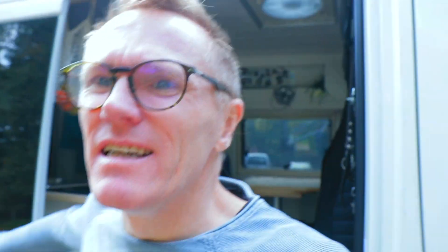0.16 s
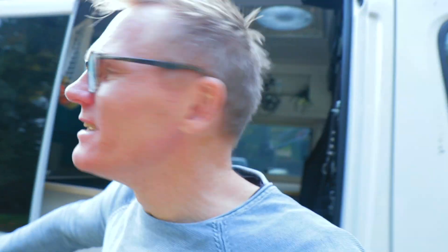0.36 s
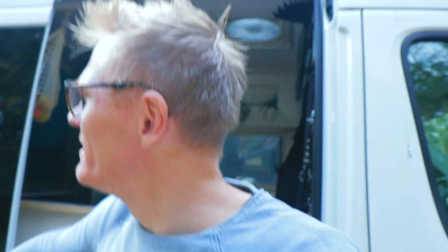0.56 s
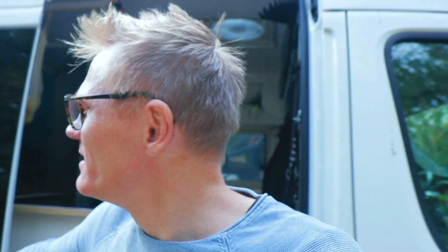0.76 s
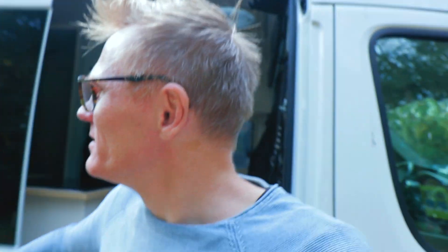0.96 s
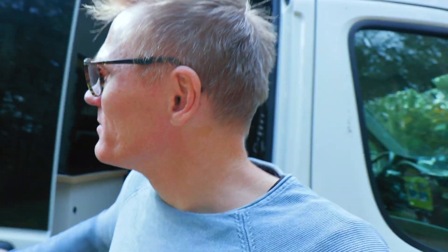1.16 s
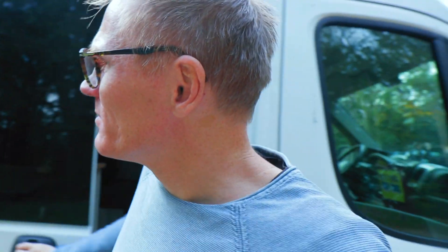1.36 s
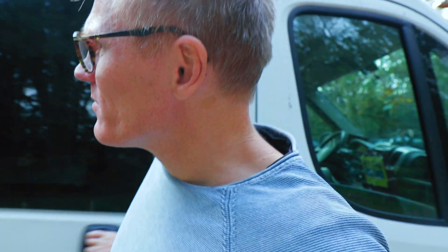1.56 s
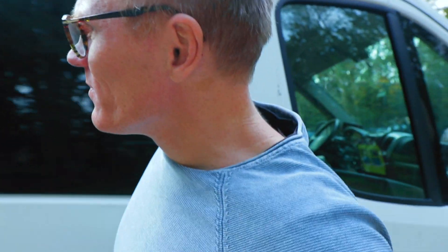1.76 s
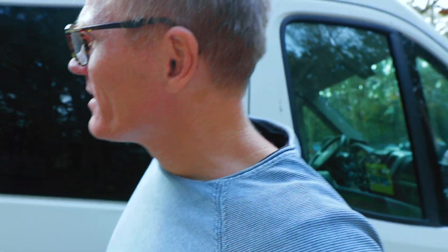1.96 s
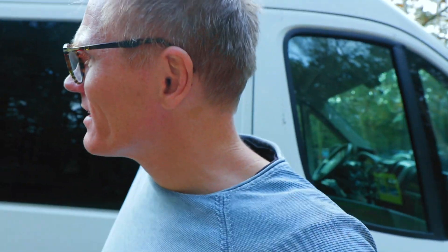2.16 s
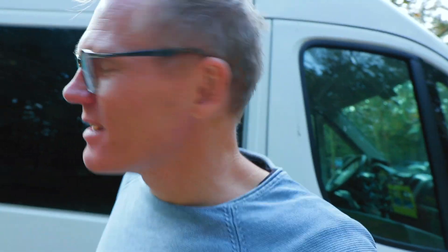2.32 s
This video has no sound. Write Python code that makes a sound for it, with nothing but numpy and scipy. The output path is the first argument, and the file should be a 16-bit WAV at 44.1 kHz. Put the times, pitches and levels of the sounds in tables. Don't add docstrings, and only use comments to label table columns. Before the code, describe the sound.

A van's sliding side door rumbles along its track and slams shut with a rattling metallic crash

```python
import sys
import numpy as np
from scipy import signal
from scipy.io import wavfile
from scipy.ndimage import uniform_filter1d

SR = 44100
rng = np.random.default_rng(int(sys.argv[2]) if len(sys.argv) > 2 else 0)


def decibels_to_gain(level_db):
    exponent = np.asarray(level_db, float) / 20
    return 10 ** exponent


def bounce(signal):
    frames = np.transpose(np.atleast_2d(signal))
    limited = np.clip(frames, -1, 1)
    pcm = np.round(limited * 32767).astype(np.int16)
    wavfile.write(sys.argv[1], SR, pcm)


N = 109764

# (time [s], body level [dB], struck region [Hz], clack level [dB],
# share of the ring time left by the seal [1])
SLAM = [(1.8292, -7, 518, -23, 0.14), (1.8320, -10.5, 343, -36, 0.085), (1.8339, -8.5, 400, -10.5, 0.24),
        (1.852, -11.5, 817, -22, 0.15), (1.8562, -5.5, 400, -18, 0.116), (1.8588, -4, 371, -2.5, 0.19),
        (1.8700, -14, 600, -7, 0.12), (1.8877, -3, 726, -19, 0.3), (1.8907, -6.5, 297.6, -4, 0.098),
        (1.8930, -1.5, 600, -10.5, 0.18), (1.880, -16, 54, -49, 0.33), (1.8980, -6.5, 156, -32, 0.061),
        (1.903, -21, 472, -31, 0.44), (1.919, -13, 126, -39, 0.23), (1.944, -22, 790, -24, 0.22),
        (1.9498, -19.5, 460, -22.5, 0.47), (1.965, -18, 143, -23, .15), (1.977, -18, 380, -36, 0.18),
        (2.008, -35, 304, -30, 0.4), (1.830, -24, 71, -40, 0.13), (1.864, -7.5, 650, -25, 0.155),
        (1.844, -33, 494, -32, 0.14), (1.8745, -13.5, 400, -13.5, .2), (1.912, -22, 600, -33, 0.18)]
# (time [s], body level [dB], struck
# region [Hz], clack level [dB])
JOLTS = [(0.1976, -28, 448, -46), (.203, -24.5, 496, -40.5), (0.212, -29.5, 327, -59),
         (.223, -35, 265, -39), (0.246, -43, 230, -42), (.551, -37, 69, -70), (0.691, -37.5, 195, -58),
         (0.75, -33.5, 105, -65), (.808, -29, 118, -41), (0.881, -35, 206, -55), (0.931, -29, 232, -47),
         (1.167, -23, 233, -55), (1.412, -22.5, 228, -53), (1.462, -24.5, 226, -54), (1.490, -19, 222, -44),
         (1.521, -23.5, 228, -50), (1.601, -18.5, 200, -53), (1.646, -19.5, 286, -44),
         (1.706, -16.5, 400, -25), (1.7305, -17.5, 620, -32)]
# (frequency [Hz], level [dB], t60 [s])
BOOM_MODES = [(54, 7, 0.36), (90.4, 6.5, 0.23), (133.5, -0.5, 0.27), (159, -1, 0.15)]
# (frequency [Hz], level [dB], t60 [s])
PANEL_MODES = [(209, -7.5, 0.14), (243.5, 0.5, 0.05), (251.4, -5, 0.23), (306, -0.5, 0.068),
               (365, -1, 0.07), (426.5, -0.5, 0.069), (502, 3, 0.055), (572.3, -10, 0.26), (620, -6, 0.18),
               (679, -5, 0.086), (722, -0.5, 0.036), (795, -9.5, 0.16)]
# (frequency [Hz], level [dB], t60 [s])
CLACK_MODES = [(943, 5, 0.032), (1113, 10.5, 0.017), (1260, 5.5, 0.039), (1498, 4.5, 0.19),
               (1640, -4, 0.019), (1680, -19, 0.006), (1896, 8, 0.077), (2410, 14, 0.018), (2479, -1, 0.22),
               (2540, 7, 0.014), (3300, 6, 0.039), (4200, -7, 0.042), (4900, -10, 0.074)]
# (time [s], level [dB])
CHATTER = [
    (1.826, -77),
    (1.835, -26.5),
    (1.849, -42),
    (1.858, -18),
    (1.868, -31.5),
    (1.884, -39),
    (1.892, -24),
    (1.91, -48),
    (2.04, -53.5),
]
# (frequency [Hz], width [Hz], level [dB])
CHATTER_TONE = [(1140, 840, 2.5), (2240, 1000, -0.5), (4300, 2200, -6.5), (6500, 5400, -13),
                (11200, 11000, -28)]
# (time [s], level [dB], centre [Hz], t60 [s])
TICKS = [(.001, -43, 4800, 0.029), (.001, -28, 910, 0.026), (.022, -52.5, 3000, 0.037),
         (0.101, -37.5, 3100, 0.032), (.101, -41, 6500, 0.011), (.413, -54.5, 3080, .06),
         (0.463, -50.5, 7000, 0.067), (0.461, -40, 900, 0.047), (0.501, -37, 1210, 0.012),
         (.539, -47, 1300, 0.021), (.618, -54, 2930, 0.043), (0.803, -61.5, 6000, 0.059),
         (.804, -68, 12900, 0.039), (0.463, -63, 13500, 0.047), (1.589, -48, 4100, 0.14),
         (1.702, -40.5, 3650, 0.073), (1.710, -39, 3700, 0.055), (1.816, -50, 7000, 0.028),
         (1.8265, -48, 8000, 0.016), (1.863, -40, 11900, 0.076), (1.835, -22.5, 5000, 0.031),
         (1.8577, -21.5, 4200, 0.029), (1.8700, -28, 6240, 0.049), (1.872, -39, 12300, 0.053),
         (1.887, -22.5, 3500, 0.033), (1.891, -30, 6840, 0.029), (1.903, -32, 5460, 0.0084),
         (1.944, -43, 5000, 0.048), (1.956, -44, 5900, 0.032), (1.98, -42.5, 5600, 0.032),
         (2.008, -41, 6860, 0.015), (2.025, -48, 5130, 0.0062), (2.0984, -41, 5730, 0.0063),
         (2.0983, -42, 9900, 0.0045), (2.337, -47, 7900, 0.0052), (2.213, -52, 5700, 0.0056),
         (2.304, -50, 5500, .006)]
# (time [s], level [dB], brightness [dB])
ROLLING = [
    (.68, -52, -24),
    (.86, -44, -7),
    (.95, -31.5, -10),
    (1.13, -33, -0.5),
    (1.24, -30.5, 0.5),
    (1.44, -32.5, 3.5),
    (1.5, -23.5, -3.5),
    (1.7, -34, 6),
    (1.82, -30.5, -0.5),
]
# (time [s], level [dB])
DOOR_SPEED = [
    (.66, -103),
    (.86, -65),
    (1.13, -53.5),
    (1.37, -47),
    (1.6, -45.5),
    (1.7, -46.5),
    (1.8, -51.5),
    (1.86, -89),
]
# (frequency [Hz], width [Hz], level [dB])
TRACK_TONE = [(1550, 380, 6.5), (2400, 1230, 1.5), (3500, 530, -9.5), (4800, 1200, -6), (6050, 520, -3.5),
              (7500, 1500, -27), (8650, 530, -12), (11000, 3100, -41)]
# (frequency [Hz], level [dB], t60 [s])
FLOOR_MODES = [(50, -16, 0.13), (89.5, -13.5, 0.14), (191, -27, 0.0098), (600, -36, 0.029)]
# (time [s], level [dB])
RUSTLE = [
    (0, -44.5),
    (.045, -67),
    (.11, -61),
    (.2, -65.5),
    (.38, -70),
    (.48, -67),
    (.65, -69.5),
    (.75, -75),
    (1., -77),
]
# (frequency [Hz], level [dB], t60 [s])
SHELL = [(143, -25.5, 0.15), (400, -32, 0.4), (1026, -18.5, 0.12), (2130, -24.5, 0.21), (5000, -29, 0.46)]
# (frequency [Hz], level [dB per Hz])
TRAFFIC = [(110, 2.5), (300, -1), (630, 1), (1150, 4.5), (2000, -9), (4000, -24.5), (8000, -29),
           (15000, -34)]
# (time [s], level [dB])
WIND = [(.1, -42.5), (.35, -52), (.55, -50.5), (.7, -51), (1.05, -46), (1.18, -51), (1.3, -55), (1.5, -69),
        (1.75, -44), (1.9, -67), (2.05, -48), (2.2, -51.5), (2.49, -55)]

FLICKER_DB = 1.1


def level(x, db):
    return x * decibels_to_gain(db) / np.sqrt(np.mean(x ** 2))


def noise(count=N):
    return rng.standard_normal(count)


def band(x, hz, width_hz):
    return signal.lfilter(*signal.iirpeak(min(hz, .4 * SR), hz / width_hz, fs=SR), x)


def band_twice(x, hz, width_hz):
    return band(band(x, hz, width_hz), hz, width_hz)


def ring(x, hz, t60):
    pole = np.exp((2j * np.pi * hz - np.log(1000) / t60) / SR)
    return signal.lfilter([1], [1, -pole], x).imag


def walk(rate):
    k = int(SR / rate)
    steps = np.repeat(noise(N // k + 1), k)
    return 1.4 * uniform_filter1d(uniform_filter1d(steps, k), k)[:N]


def curve(rows, column=1):
    table = np.array(rows)
    return np.interp(np.arange(N) / SR, table[:, 0], table[:, column])


def struck(modes, column, fall_db):
    scatter_db, detune, contact_cycles = 3, .05, .25
    jolt_damping, jolt_bass_fall = 0.3, 2.07
    out, t = np.zeros(N + SR), np.arange(SR // 4) / SR
    hz, db, t60 = np.array(modes).T[:, :, None]
    blows = [r + (jolt_damping, jolt_bass_fall) for r in JOLTS] + [r + (1,) for r in SLAM]
    for blow in blows:
        s, region_hz, damping, bass_fall = blow[0], blow[2], blow[-2], blow[-1]
        mix, sign, tuning = rng.standard_normal((3, len(modes), 1))
        fall = fall_db * np.log2(hz / region_hz) ** 2 * np.where(hz < region_hz, bass_fall, 1)
        share = decibels_to_gain(db + scatter_db * mix - fall)
        share = share / np.sqrt(np.sum(share ** 2)) * np.sign(sign)
        decay = decibels_to_gain(blow[column] - 60 * t / (t60 * max(damping, .03)))
        onset = 1 - np.exp(-t * hz / contact_cycles)
        rings = share * decay * onset * np.sin(2 * np.pi * hz * (1 + detune * tuning) * t)
        start = int(s * SR)
        out[start:start + len(t)] += rings.sum(axis=0)
    return out[:N]


def punches():
    gain_db, decay_cycles = 1, 11
    out, t = np.zeros(N + SR), np.arange(SR // 8) / SR
    for s, db, hz, *_ in JOLTS + SLAM:
        swing = decibels_to_gain(db + gain_db - 60 * t * hz / decay_cycles) * np.sin(2 * np.pi * hz * t)
        start = int(s * SR)
        out[start:start + len(t)] -= band(swing, hz, 2 * hz)
    return out[:N]


def chatter():
    grit = noise() * decibels_to_gain(2.8 * walk(600))
    tone = sum(level(band_twice(grit, hz, w), db) for hz, w, db in CHATTER_TONE)
    before, after = (CHATTER[0][0] - .01, -120), (CHATTER[-1][0] + .05, -120)
    return level(tone, 0) * decibels_to_gain(curve([before] + CHATTER + [after]))


def ticks():
    width, rise_s = 0.55, 0.00038
    out, t = np.zeros(N + SR), np.arange(SR // 8) / SR
    for s, db, hz, t60 in TICKS:
        burst = band(band(noise(len(t)), hz, 2 * width * hz), hz, width * hz)
        start = int(s * SR)
        out[start:start + len(t)] += level(burst, db) * decibels_to_gain(-60 * t / t60) * (1 - np.exp(-t / rise_s))
    return out[:N]


def track_bumps():
    per_s, spread_db = 1200, 5
    hits = rng.random(N) < per_s / SR
    return hits * decibels_to_gain(spread_db * noise()) * np.sign(noise())


def rollers():
    shared_share, judder_db = 0.41, 1.6
    shared, judder = track_bumps(), decibels_to_gain(judder_db * walk(39.87))

    def drive(modes, tilt):
        out = 0
        for hz, db, t60 in modes:
            push = (shared_share * shared + track_bumps()) * judder * decibels_to_gain(1.6 * walk(11.9))
            out = out + decibels_to_gain(db) * hz ** tilt * ring(push, hz, t60)
        return out

    low = level(drive(PANEL_MODES[:4], -1.4), -4.5) + level(drive(BOOM_MODES[2:], 0.11), -13.5)
    upper = level(drive(PANEL_MODES[4:], -0.72), -4.5) + level(drive(CLACK_MODES[:8], -3.4), -14)
    body = low + decibels_to_gain(curve(ROLLING, column=2)) * upper
    body = signal.sosfilt(signal.butter(4, 105, "high", fs=SR, output="sos"), body)
    before, after = (ROLLING[0][0] - .08, -90), (ROLLING[-1][0] + 0.084, -90)
    effort = curve([before] + [r[:2] for r in ROLLING] + [after])
    hiss = 0
    for hz, w, db in TRACK_TONE:
        hiss = hiss + level(band_twice(noise(), hz, 2 * w), db) * decibels_to_gain(FLICKER_DB * walk(24.56))
    return decibels_to_gain(effort) * body + decibels_to_gain(curve(DOOR_SPEED)) * level(hiss, 0)


def thump():
    start_s, push_s = 0., 0.00044
    kick = np.zeros(N)
    kick[int(start_s * SR):int((start_s + push_s) * SR)] = 1 / (push_s * SR)
    return sum(decibels_to_gain(db) * ring(kick, hz, t60) for hz, db, t60 in FLOOR_MODES)


def rustle():
    grain = noise() * decibels_to_gain(1.6 * walk(87.2))
    limits = signal.butter(4, [2400, 9300], "band", fs=SR, output="sos")
    cloth = signal.sosfilt(limits, band(grain, 3600, 9000))
    return level(cloth, 0) * decibels_to_gain(curve(RUSTLE))


def shell(x):
    t, tail = np.arange(SR // 2) / SR, 0
    for hz, db, t60 in SHELL:
        tail = tail + level(band(noise(len(t)), hz, hz), db) * decibels_to_gain(-60 * t / t60)
    return signal.fftconvolve(x, tail)[:N] * decibels_to_gain(-22.5)


def wind():
    gust_db = 2.5
    low = level(band(noise(), 22.0, 14.0), 0) * decibels_to_gain(gust_db * walk(10))
    high = level(band_twice(noise(), 60, 60), -8) * decibels_to_gain(gust_db * walk(4.33))
    return (low + high) * decibels_to_gain(curve(WIND))


def traffic():
    out, swell = 0, walk(0.55)
    shape_hz, shape_db = np.array(TRAFFIC).T
    for hz in 110 * 2 ** np.arange(0, 7.4, .5):
        db = np.interp(np.log(hz), np.log(shape_hz), shape_db)
        db = db + 10 * np.log10(hz)
        db = db + 0.75 * swell + FLICKER_DB * walk(10.23)
        out = out + decibels_to_gain(db) * level(band_twice(noise(), hz, hz / 2), 0)
    return level(out, -51)


def scene():
    body = decibels_to_gain(-5) * struck(BOOM_MODES + PANEL_MODES, column=1, fall_db=13)
    clack = struck(CLACK_MODES, column=3, fall_db=0.35)
    door = body + clack + punches() + chatter() + ticks()
    mix = door + shell(door) + rollers() + thump() + rustle() + wind() + traffic()
    return mix[None]


def low_pass(x):
    return signal.sosfilt(signal.butter(12, 15730, fs=SR, output="sos"), x)


def record(dry):
    hiss = level(band(noise(), 15500, 400), -81)
    rounded = np.tanh(0.44 * dry) / .45
    top_cut = signal.ellip(10, .3, 60, 15760, fs=SR, output="sos")
    finished = signal.sosfilt(top_cut, rounded + hiss)
    return low_pass(finished)


dry = scene()
out = record(dry)
bounce(out)
```